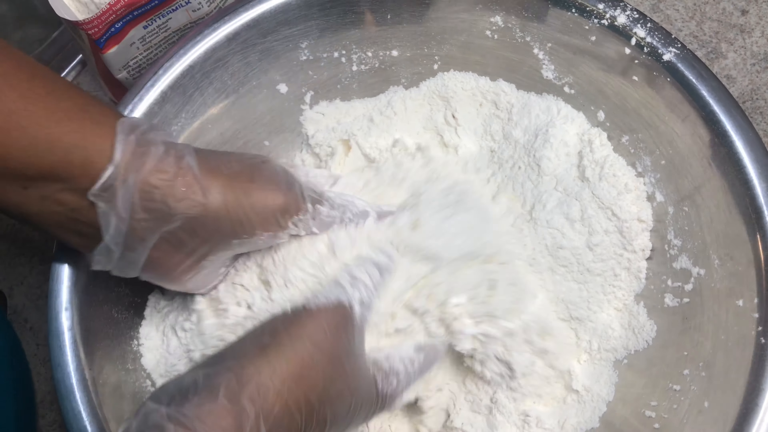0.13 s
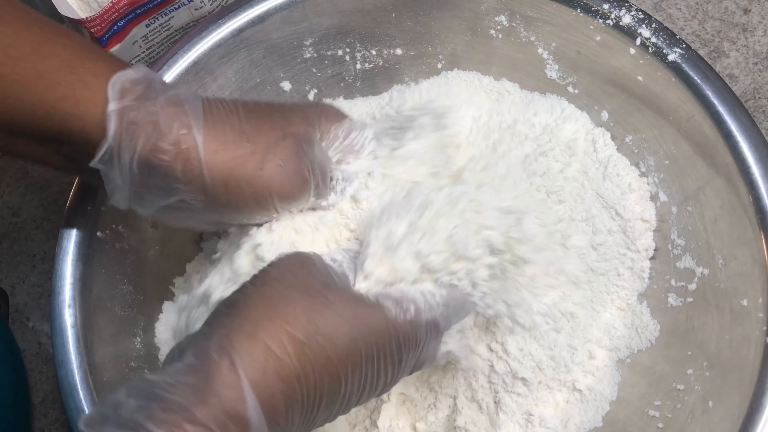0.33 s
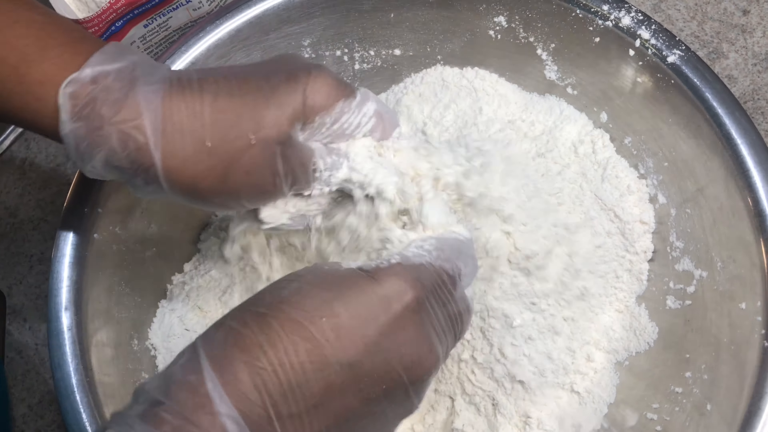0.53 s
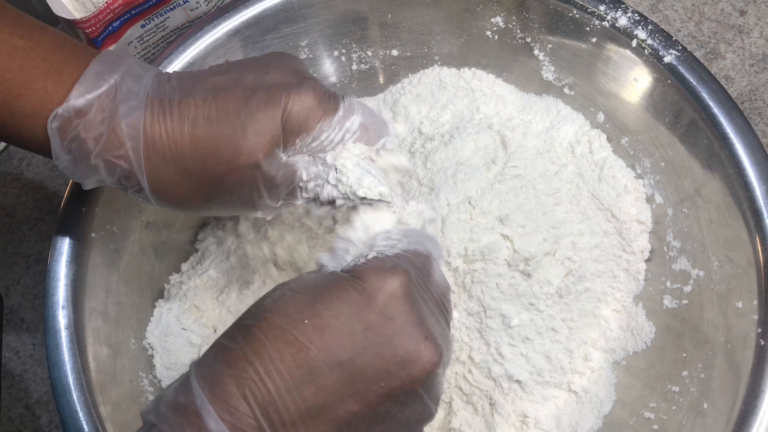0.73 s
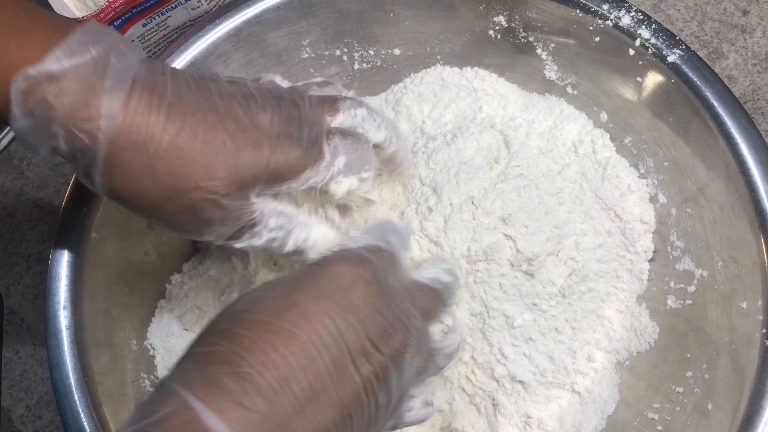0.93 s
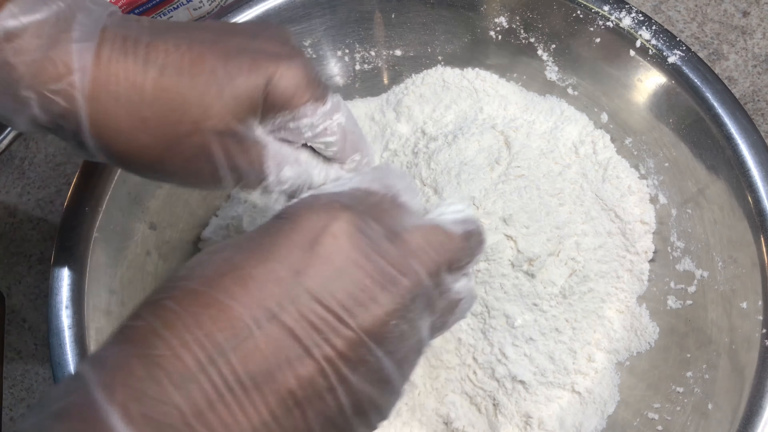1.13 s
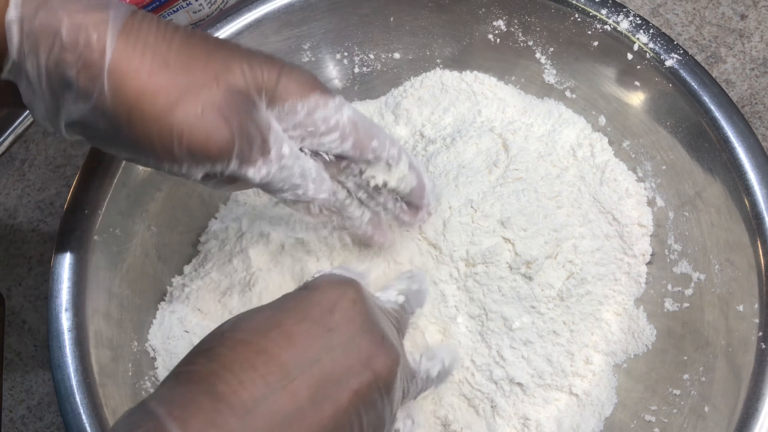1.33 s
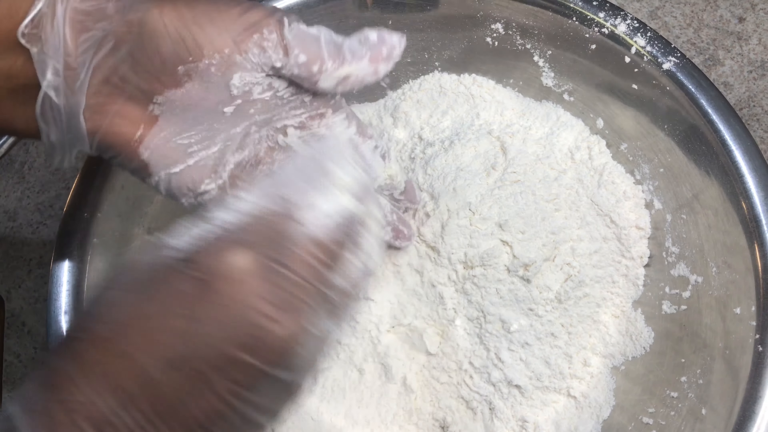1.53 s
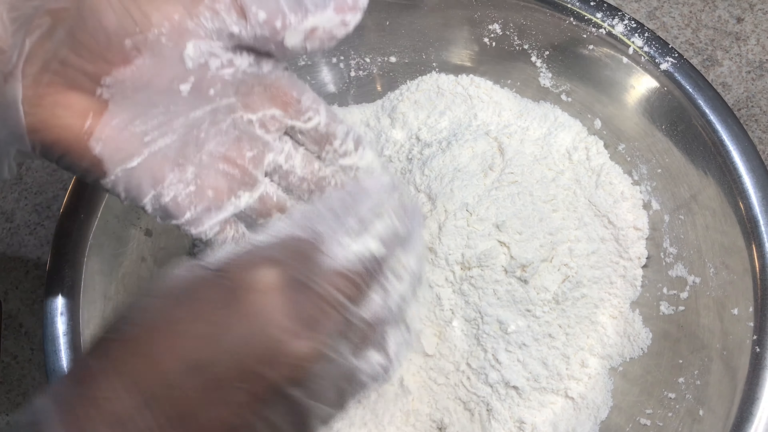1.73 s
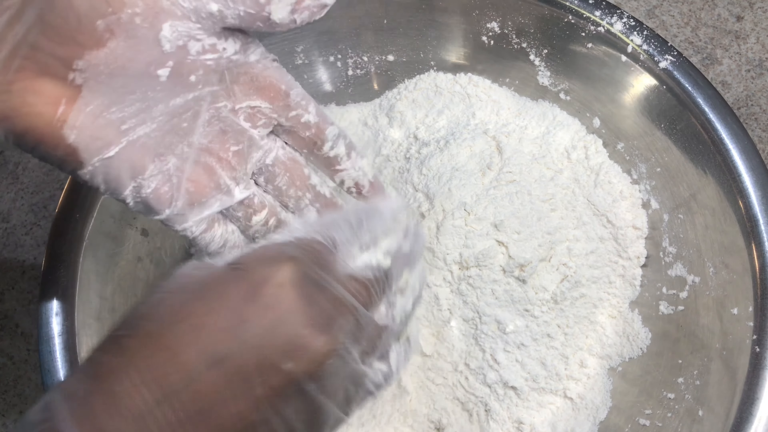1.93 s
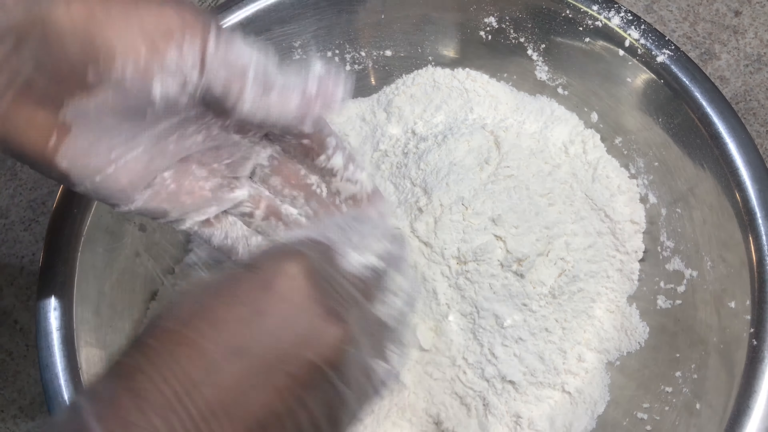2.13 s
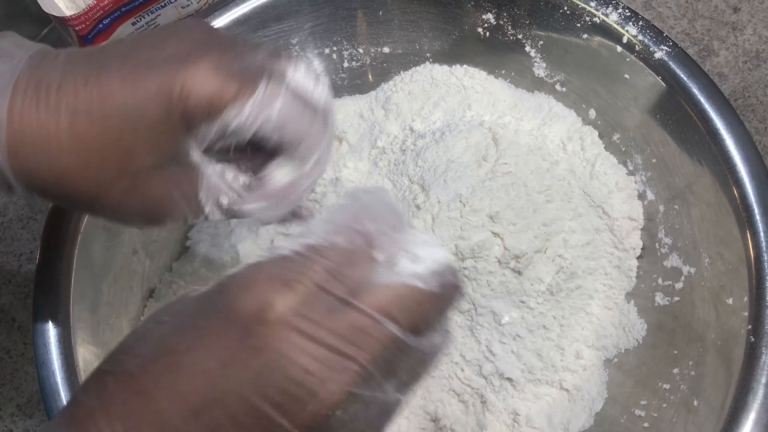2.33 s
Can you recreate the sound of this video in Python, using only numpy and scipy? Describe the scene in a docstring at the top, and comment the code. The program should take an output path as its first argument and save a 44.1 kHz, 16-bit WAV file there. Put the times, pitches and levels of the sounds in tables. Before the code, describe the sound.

Thin plastic gloves rustle and scrape softly through flour in a metal bowl, close up.

```python
"""Rubbing butter into flour

Hands in thin plastic gloves work butter into flour in a steel bowl, close to the microphone.
Each rub is a hiss of tiny slips, duller where the flour is pressed. The glove film crinkles,
loose flour sifts through the fingers and the bowl groans under the hands. The microphone picks up
a slow sway, soft bumps and two sharp ticks, all over a bed of mains hum and room noise."""
import sys
import numpy as np
from scipy import signal
from scipy.fft import rfft, irfft
from scipy.io import wavfile

SR = 44100
rng = np.random.default_rng(int(sys.argv[2]) if len(sys.argv) > 2 else 0)


def unload_audio(sound):
    """Save the sound as a 16-bit wav file, at the path given as the first command line argument."""
    columns = np.transpose(np.atleast_2d(sound))
    # keep every value between -1 and 1, then stretch to whole-number steps
    steps = np.round(np.clip(columns, -1, 1) * 32767)
    wavfile.write(sys.argv[1], SR, steps.astype(np.int16))


N = 109191
T = np.arange(N) / SR

# Mains hum. Each row: pitch in Hz, level in dB.
HUM_PARTIALS = [(120, -47), (180, -62.5)]
# Bass-heavy room tone. Each row: frequency in Hz, gain in dB.
ROOM_EQ = [(20, 4.5), (45, 4), (90, 0), (170, -8.5), (320, -4.5), (450, -11), (570, -10.5), (720, -16),
           (1000, -18.5), (2000, -27.5), (4000, -29.5), (7000, -34), (11500, -35.5), (15500, -43)]
# Strokes of glove on flour. Each row: start in seconds, length in seconds, level in dB,
# attack in seconds, release in seconds per 20 dB of fall, scrape level in dB against the hiss.
RUB_STROKES = [(-.02, 0.047, -62, .01, 0.27, -1.5), (0.683, 0.056, -54.5, 0.027, 0.19, -7),
               (0.776, .125, -57, 0.047, 0.12, -11), (1.054, 0.18, -53.5, 0.083, 0.11, -26),
               (1.187, 0.1, -45, 0.07, 0.025, -17), (1.303, 0.212, -62.5, 0.024, 0.12, -4),
               (1.551, 0.079, -42, 0.034, 0.051, -14.5), (1.8, 0.055, -43, 0.0037, 0.054, -15.5),
               (2.012, 0.082, -44.5, 0.0094, 0.14, -14), (2.167, 0.078, -49, 0.05, 0.072, -6),
               (2.275, 0.057, -46, 0.038, .055, -1.5), (2.377, 0.068, -45.5, 0.047, 0.045, -10)]
# The bright hiss of a rub. Each row: frequency in Hz, gain in dB.
HISS_EQ = [(300, -6.5), (1300, -12), (2000, -36), (2350, -5.5), (3400, -1.5), (4700, -1.5), (6000, -4),
           (9400, -3), (12500, -5.5), (15500, -8)]
# The dull scrape of pressed flour. Each row: frequency in Hz, gain in dB.
SCRAPE_EQ = [(150, -16), (300, -5), (550, -1), (800, 3), (1600, 1.5), (2700, 4.5), (4500, -28.5),
             (15000, -47)]
# Hollows between hands and bowl. Each row: pitch in Hz, width in Hz, level in dB against the hiss.
HAND_HOLLOWS = [(2407, 106, -16), (2940, 110, -18.5), (3830, 190, -20), (4800, 120, -19), (6040, 110, -37),
                (7550, 89, -26), (9000, 390, -18)]
# Fader moves for the microphone's sway. Each row: time in seconds, level in dB.
SWAY_FADER = [(0, -26.5), (.45, -27.5), (.95, -33), (1.4, -24.5), (1.7, -24), (1.92, -9.5), (2.2, -10),
              (2.47, -15)]
# Bumps on the microphone. Each row: start in seconds, level in dB before softening, pitch in Hz.
MIC_BUMPS = [(.153, -40, 55), (0.397, -15.5, 39.6), (0.654, -24, 39.3)]
# Sharp ticks. Each row: time in seconds, peak in dB before the top is rolled off.
TICK_HITS = [(0.6625, -12), (1.9862, -16.5)]
# Falls of loose flour. Each row: centre in seconds, spread in seconds, level in dB.
FLOUR_FALLS = [(.85, 0.11, -67), (1.14, 0.068, -60.5), (1.43, 0.085, -66)]
# The thin whisper of falling flour. Each row: frequency in Hz, gain in dB.
SIFT_EQ = [(1000, -14), (2000, -19), (2700, 5), (3300, -6), (3900, 4.5), (5000, 2), (5900, -8), (8000, -9),
           (12000, -3), (14500, -20)]
# Buckling folds of glove film. Each row: centre in seconds, level in dB, pitch in Hz,
# flour crunch in dB against the fold.
GLOVE_FOLDS = [(.89, -59, 4600, -10), (0.91, -52, 2840, -16), (0.927, -55.5, 6100, -12),
               (1.15, -47, 4020, -14), (1.274, -47.5, 3830, -14), (1.562, -51.5, 3250, -8),
               (1.585, -49.5, 4730, 0.5), (1.627, -49, 5760, -2.5), (1.81, -54, 2230, 5.5),
               (2.025, -43, 2680, 0), (2.432, -50.5, 2300, -3)]
# Groans of the pressed bowl. Each row: centre in seconds, level in dB, pitch in Hz.
BOWL_GROANS = [(.9, -63.5, 319), (1.33, -55.5, 316), (1.46, -52, 285.6), (1.89, -49.5, 177),
               (2.03, -54.5, 328)]


def from_db(db):
    """Decibels to gain."""
    return 10 ** (np.asarray(db) / 20)


def unit_rms(x):
    """Scale to rms 1."""
    return x / np.sqrt(np.mean(x ** 2) + 1e-20)


def low_pass(x, hz, order=2):
    """Butterworth low-pass."""
    return signal.sosfilt(signal.butter(order, hz, fs=SR, output="sos"), x)


def drift(top_hz):
    """A smooth random wander at rms 1."""
    return unit_rms(low_pass(rng.standard_normal(N + SR), top_hz)[SR:])


def equalise(x, curve):
    """Shape x with a smooth EQ curve; rms 1."""
    hz, db = np.transpose(curve)
    bin_hz = np.maximum(np.arange(N + 1) * SR / (2 * N), 1)
    gain = from_db(np.interp(np.log(bin_hz), np.log(hz), db))
    return unit_rms(irfft(rfft(x, 2 * N) * gain)[:N])


def resonate(x, hz, width_hz):
    """Ring x through one resonance; rms 1."""
    r = np.exp(-np.pi * width_hz / SR)
    return unit_rms(signal.lfilter([1, 0, -1], [1, -2 * r * np.cos(2 * np.pi * hz / SR), r * r], x))


def swell(centre_s, spread_s):
    """A bell-shaped fade in and out, peaking at 1."""
    return np.exp(-.5 * ((T - centre_s) / spread_s) ** 2)


def slips(per_s=22000, spread_db=3):
    """The grain of friction: tiny random clicks of uneven size."""
    sizes = from_db(spread_db * np.minimum(rng.exponential(1, N), 5)) * rng.standard_normal(N)
    return sizes * (rng.random(N) < per_s / SR)


def kitchen_bed(room_db=-47.5, waver_db=1.32):
    """Steady room noise and a slightly wavering mains hum."""
    hum = 0
    for hz, db in HUM_PARTIALS:
        level = from_db(db + waver_db * drift(3.65))
        hum += np.sqrt(2) * level * np.sin(2 * np.pi * (hz * T + rng.random()))
    return hum + from_db(room_db) * equalise(rng.standard_normal(N), ROOM_EQ)


def rubbing(hollow_waver_db=3.5, grip_waver_db=1.02):
    """Glove slips over flour: each stroke swells, holds and fades; the grip wavers as flour gives way."""
    hiss_power, scrape_power = 0, 0
    for start, length, db, attack, release, scrape_db in RUB_STROKES:
        fall_db = 20 * np.maximum(T - start - length, 0) / release
        stroke = np.clip((T - start) / attack, 0, 1) * from_db(db - fall_db)
        hiss_power += stroke ** 2
        scrape_power += (stroke * from_db(scrape_db)) ** 2
    hiss = equalise(slips(), HISS_EQ)
    for hz, width_hz, db in HAND_HOLLOWS:   # these come and go as the hands change shape
        hiss += from_db(db + hollow_waver_db * drift(5.1)) * resonate(slips(), hz, width_hz)
    scrape = equalise(slips(), SCRAPE_EQ)
    grip = from_db(grip_waver_db * drift(43))
    return grip * (np.sqrt(hiss_power) * hiss + np.sqrt(scrape_power) * scrape)


def mic_sway(sway_hz=4.1, rumble_db=-28):
    """The microphone sways below hearing, with a deep random rumble."""
    level = from_db(np.interp(T, *np.transpose(SWAY_FADER)))
    sway = np.sqrt(2) * level * np.cos(2 * np.pi * sway_hz * T)
    return sway + from_db(rumble_db) * drift(7.05)


def mic_bumps(wobble_t60_s=0.17, push_decay_s=0.055, soften_hz=108):
    """Each soft bump on the microphone is a dying push of air with a damped wobble."""
    out = 0
    for start, db, hz in MIC_BUMPS:
        age = np.maximum(T - start, 0)
        wobble = np.exp(-np.log(1000) * age / wobble_t60_s) * np.sin(2 * np.pi * hz * age)
        push = from_db(2.5) * (T > start) * np.exp(-age / push_decay_s)
        out += low_pass(from_db(db) * (wobble + push) + 1e-18, soften_hz, order=4)
    return out


def ticks(spread_s=18e-6, top_hz=11100):
    """Single dry spikes with no ring."""
    spikes = sum(from_db(db) * swell(centre, spread_s) for centre, db in TICK_HITS)
    return -low_pass(spikes + 1e-18, top_hz, order=4)


def sifting():
    """Loose flour falls through the fingers in faint, fine-grained swells."""
    level = sum(from_db(db) * swell(centre, spread) for centre, spread, db in FLOUR_FALLS)
    return level * equalise(slips(), SIFT_EQ)


def glove_crinkles(spread_s=0.0054, width_hz=530):
    """A fold of film buckles in a short clump of slips around one pitch, with a dull crunch of flour."""
    out = 0
    for centre, db, hz, crunch_db in GLOVE_FOLDS:
        clicks = slips(per_s=7000)
        fold = resonate(resonate(clicks, hz, 2 * width_hz), hz, width_hz)
        crunch = from_db(crunch_db) * equalise(clicks, SCRAPE_EQ)
        out += from_db(db) * swell(centre, spread_s) * (fold + crunch)
    return out


def bowl_groans(spread_s=0.037, width_hz=44):
    """Hands press on the bowl, drawing short, narrow swells of low friction noise."""
    out = 0
    for centre, db, hz in BOWL_GROANS:
        friction = rng.standard_normal(N)
        groan = resonate(resonate(friction, hz, width_hz), hz, 2 * width_hz)
        out += from_db(db) * swell(centre, spread_s) * groan
    return out


def scene():
    """The work in the bowl, the handling noise and the kitchen, mixed to mono."""
    bowl = rubbing() + glove_crinkles() + sifting() + bowl_groans()
    handling = mic_sway() + mic_bumps() + ticks()
    return (bowl + handling + kitchen_bed())[None]


def record(dry, cutoff_hz=15700):
    """A steep high cut takes off the very top."""
    sos = signal.ellip(14, .1, 90, cutoff_hz, fs=SR, output="sos")
    settled = signal.sosfilt_zi(sos)[:, None] * dry[:, :1]   # opens without a click
    return signal.sosfilt(sos, dry, zi=settled)[0]


dry = scene()
out = record(dry)
unload_audio(out)
```